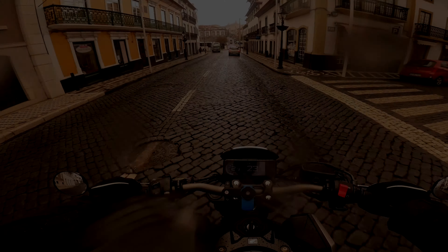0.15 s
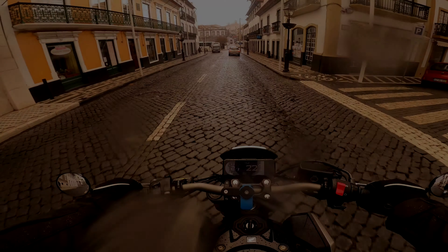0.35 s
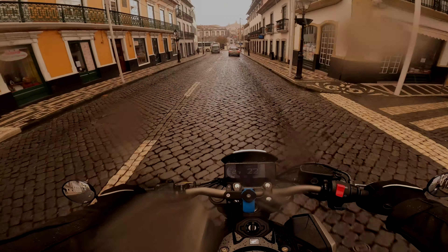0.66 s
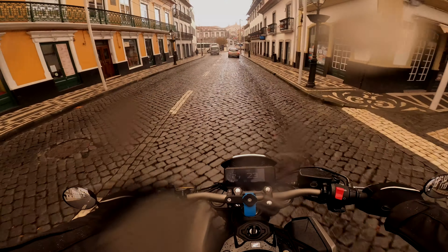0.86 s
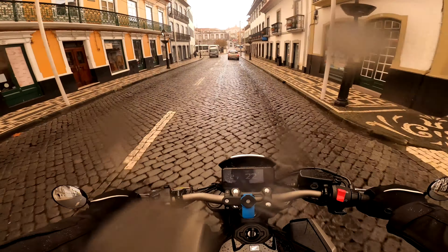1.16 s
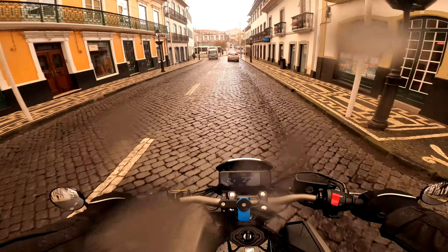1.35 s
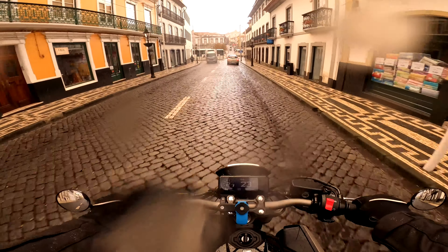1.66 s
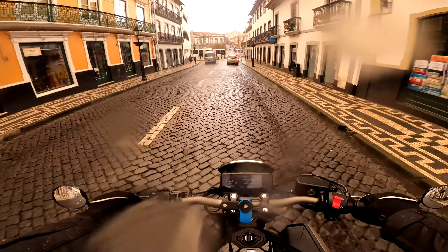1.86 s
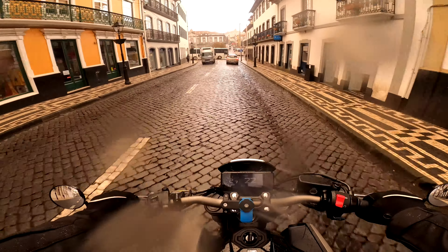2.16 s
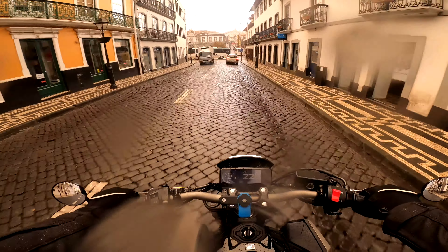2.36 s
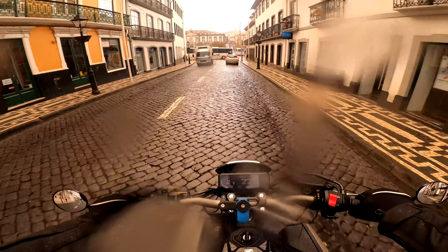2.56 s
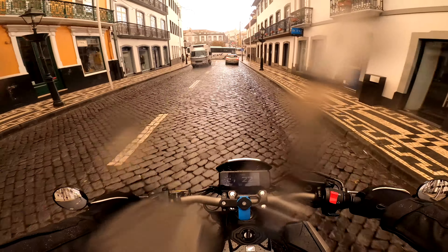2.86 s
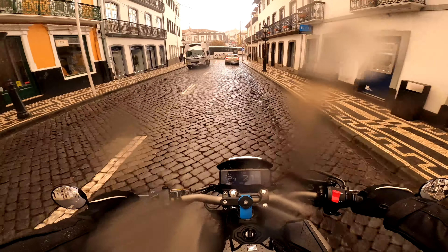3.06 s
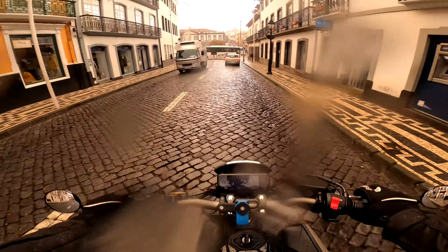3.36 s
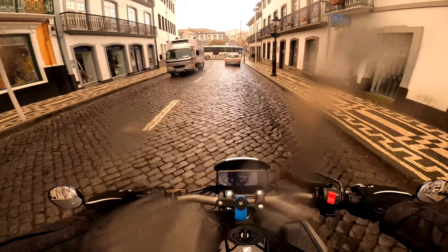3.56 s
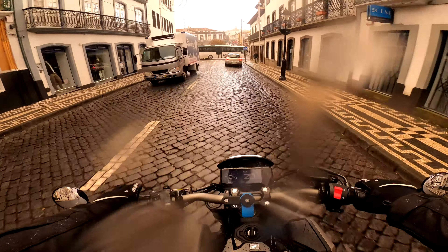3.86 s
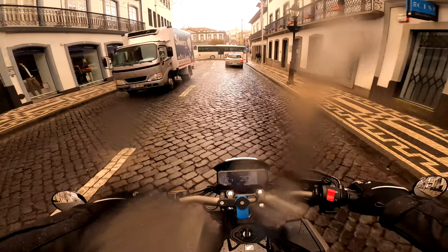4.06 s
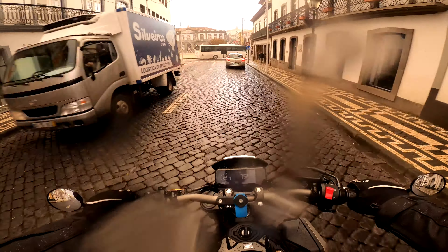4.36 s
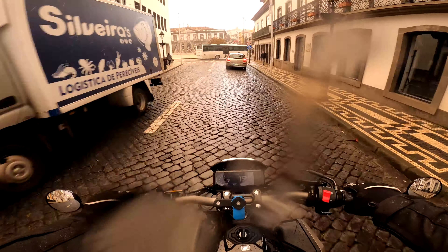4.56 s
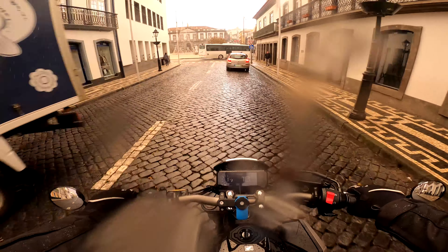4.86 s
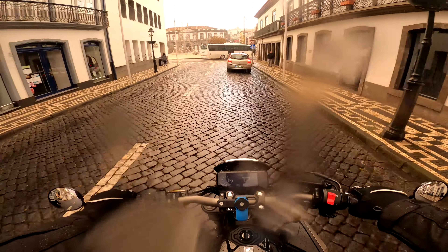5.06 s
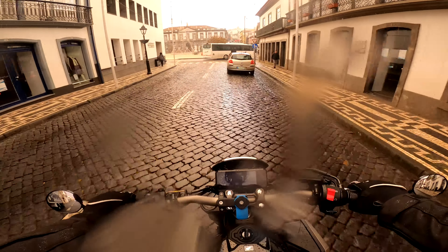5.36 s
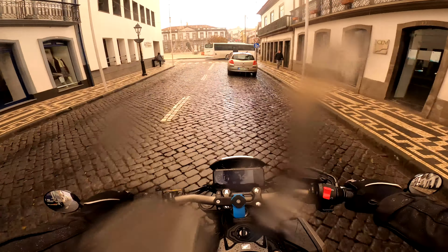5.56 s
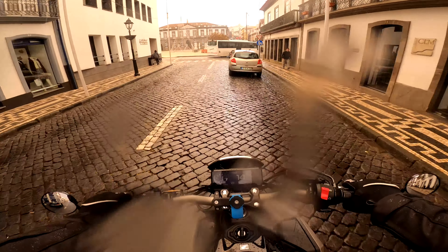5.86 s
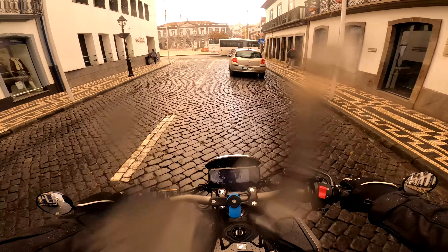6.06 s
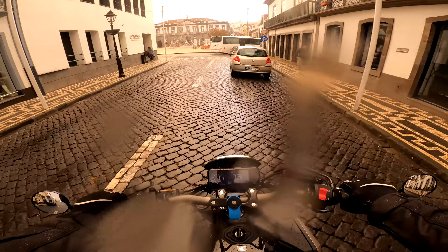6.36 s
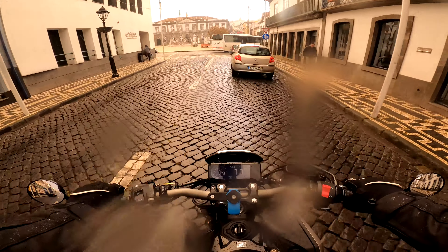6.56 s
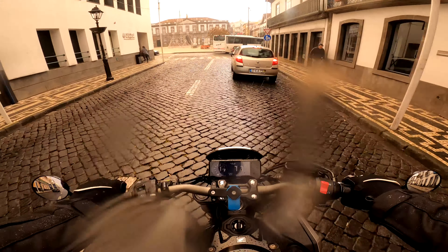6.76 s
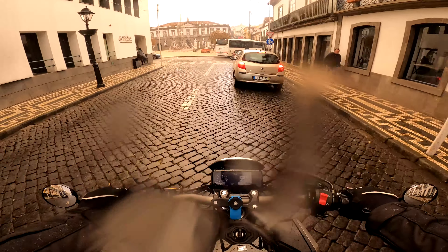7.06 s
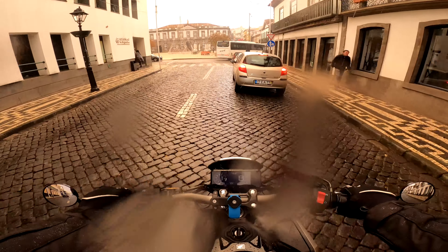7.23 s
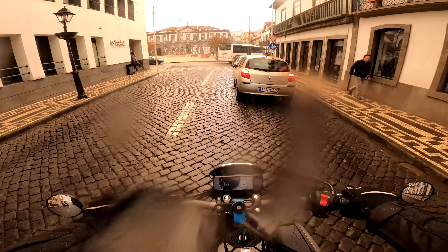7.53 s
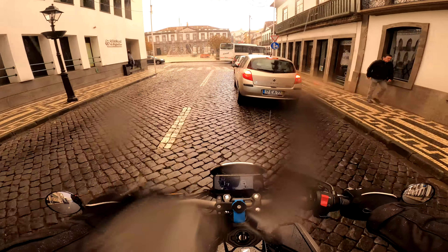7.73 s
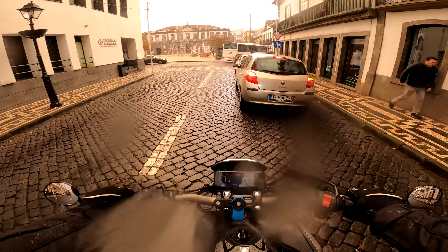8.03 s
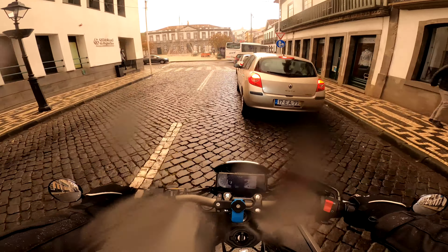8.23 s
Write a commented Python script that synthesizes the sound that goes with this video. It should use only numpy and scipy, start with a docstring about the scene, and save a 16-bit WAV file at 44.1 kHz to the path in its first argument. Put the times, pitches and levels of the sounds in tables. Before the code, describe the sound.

From the rider's helmet, a low motorcycle exhaust drums along wet stones, revs sag, a rattling lorry sweeps by, then uneven idling continues.

```python
"""A motorcycle pulls away over wet cobbles in a narrow street, heard from the rider's helmet.
At first the exhaust throbs as a train of rounded puffs over engine clatter, drumming, hissing tyres and soft wind;
exhaust, clatter and drumming follow firing or wheel cycles, while the hiss and wind drift at random,
and a wavering sine soon whines from the drive. The throttle closes, the revs sag, and the brake squeaks in thin tones.
A box lorry splashes past the other way, as noise swelling with nearness plus jolts and puddle slaps; a few
raindrops begin to tick on the microphone housing as snaps and short rings, and the engine drops to a hunting idle."""
import sys
import numpy as np
from scipy import signal
from scipy.fft import rfft, irfft
from scipy.io import wavfile
from scipy.ndimage import uniform_filter1d, minimum_filter1d

SR = 44100
rng = np.random.default_rng(int(sys.argv[2]) if len(sys.argv) > 2 else 0)


def store_pcm(level_fs):
    """Save levels as 16-bit WAV."""
    pcm = np.round(np.clip(level_fs, -1, 1) * 32767).astype(np.int16)
    wavfile.write(sys.argv[1], SR, np.atleast_2d(pcm).T)


N = 370170
TIME = np.arange(N) / SR

# Engine speed, in firings per second: it picks up, cruises and surges to and fro until the throttle closes.
START_HZ, CRUISE_HZ, PICKUP_S = 65.5, 70.5, .25
SURGE_HZ, SURGE_PERIOD_S, SURGE_CREST_S = 1.9, .44, .56  # depth, period and the moment of one crest
THROTTLE_OFF_S = 2.19
# Revs sagging against the closed throttle, then falling once declutched.
# Each row: time in seconds, firings per second.
REV_SAG = [(2.3, CRUISE_HZ), (2.62, 67.5), (2.88, 63), (3.35, 61.3), (4.08, 61), (4.5, 56), (4.83, 53),
           (5.18, 39.5)]
# The hunting idle. Each row: time in seconds, firings per second.
IDLE_HUNT = [(5.2, 41.1), (6.38, 41.7), (6.86, 40.3), (7.31, 41.7), (7.45, 40.3), (7.86, 41.6),
             (7.99, 40.3), (8.15, 41.7), (8.39, 41.6)]
LOAD_POWER = 1.1  # load goes as this power of the revs above idle

# Exhaust level under load and at idle, and the change while the wheels drive the engine.
EXHAUST_LOAD_DB, EXHAUST_IDLE_DB, OVERRUN_DB = -11, -8.6, -1
HUNT_DB_PER_HZ = 0.5  # the idle swells as it speeds up
# Half the time from dip to crest of a puff: under load, at idle, and what the overrun adds.
PUFF_LOAD_S, PUFF_IDLE_S, PUFF_OVERRUN_S = 0.0025, 0.0022, 0.00028
FIRING_SCATTER_DB = .8
EASE_S = 0.22  # the throttle eases this long before it shuts
RECOVERY_S, RECOVERY_RELEASE_S = 4.7, 0.21  # the engine takes up its own idle again
# Resonances of the silencer shell. Each row: pitch in Hz, nominal width in Hz, mean level in dB.
SHELL_MODES = [(122.3, 10.6, -26), (209.8, 20, -29), (247.5, 23, -30.5)]
SHELL_WANDER_DB = 3
# Hollow notes in the silencer.
# Each row: start in seconds, length in seconds, multiple of the firing rate, level in dB.
SILENCER_BOOMS = [(.1, .95, 2, -23), (1.3, .55, 2, -22), (.4, 2.2, 4, -35), (1.95, .75, 2, -27),
                  (2.76, .62, 2, -21), (4.19, .08, 2, -18), (4.44, .06, 2, -20), (4.63, .06, 2, -19),
                  (4.77, .06, 2, -18), (4.55, .28, 4, -28), (4.93, .06, 2, -21), (6.23, .1, 3, -23),
                  (6.7, .15, 3, -20), (7.23, .1, 3, -22), (7.99, .1, 3, -20)]
BOOM_ATTACK_S, BOOM_RELEASE_S = .04, .03
# Brief dips of the low throb. Each row: centre in seconds, gain at the centre in dB.
THROB_LULLS = [(2.29, -5), (3.37, -6), (3.48, -6), (4.16, -5), (4.31, -10), (4.57, -10), (4.87, -9),
               (5.79, -4), (7.96, -6)]
LULL_WIDTH_S = 0.017

CLATTER_LOAD_DB, CLATTER_IDLE_DB = -38, -44
CLATTER_START_DB, CLATTER_BUILD_S = -2.5, 0.96  # the clatter builds up as the engine pulls
CASING_DB = -1.17  # trim on the ring of the casing
# Spectrum of the clatter's rush. Each row: frequency in Hz, relative density in dB per Hz.
CLATTER_SPECTRUM = [(500, -8.5), (1000, -5), (1450, 1), (1850, -3.5), (2200, -4.5), (2750, -2),
                    (3300, -10.5), (3800, -12.5), (5000, -18), (7500, -37.5)]
# Resonances of the engine casing.
# Each row: pitch in Hz, nominal width in Hz, relative level in dB under load, relative level in dB at idle.
CASING_MODES = [(279, 11, -4.5, 10.5), (453, 80, 2, -17), (662, 27, -5, -4.5), (846, 33, -17, -1.5),
                (987, 34, -3.5, 0.5), (1617, 63, -8.5, -11.5), (1724, 88, -12.5, -6),
                (2556, 140, -16.5, -8), (2803, 150, -12, -11), (3116, 100, -12.5, -26),
                (3248, 140, -15, -6.5)]

# Tyre levels, their fall once the throttle is shut, and the build-up of spray as the machine gathers way.
ROAR_DB, ROAR_FALL_DB_PER_S = -29.5, 0.18
SPRAY_DB, SPRAY_FALL_DB_PER_S = -52.5, 0.7
SPRAY_START_DB, SPRAY_BUILD_S = -1, .55
# Wheels drumming on the stones.
# Each row: time in seconds, stones per second, drum level in dB, unevenness under the front wheel (0-1).
COBBLE_RUN = [(0, 64, -23, .21), (.95, 62, -23.5, .18), (1.15, 64, -19, .21), (1.65, 62, -22, .2),
              (2.2, 54, -17.5, .11), (2.7, 57.5, -17.5, .03), (3.3, 54, -18, .04), (3.6, 56, -19, .17),
              (4.3, 57.6, -17.5, .14), (5.6, 54.3, -20, .2), (8.39, 48.5, -24.5, .19)]
# Spectrum of the drumming. Each row: frequency in Hz, relative density in dB per Hz.
TYRE_DRUM_SPECTRUM = [(12, -15), (25, -4), (38, 2), (62, -6), (88, 0), (118, -2.5), (150, -3.5), (190, -15),
                      (260, -15.5), (340, -23.5), (700, -43.5)]
# Spectrum of the tyre roar. Each row: frequency in Hz, relative density in dB per Hz.
TYRE_ROAR_SPECTRUM = [(100, -18.5), (220, 3), (300, -2), (450, -5.5), (560, -5.5), (700, -4.5),
                      (850, -10.5), (1000, -10.5), (1150, -13.5), (1500, -17.5), (2200, -30)]
# Spectrum of the water hiss. Each row: frequency in Hz, relative density in dB per Hz.
TYRE_SPRAY_SPECTRUM = [(1500, -13.5), (3500, 7.5), (5000, -5.5), (6800, -3.5), (7800, -11), (9700, -10),
                       (12000, -19.5), (14000, -31.5), (15500, -42.5)]

WIND_DB, WIND_BUILD_S = -28, 0.9  # buffeting grows as the motorcycle gathers way
# Spectrum of the buffeting. Each row: frequency in Hz, relative density in dB per Hz.
WIND_SPECTRUM = [(10, -4.5), (22, -5.5), (35, 1.5), (70, -8.5), (150, -26)]

# Snatches of thin whine from the drive.
# Each row: start in seconds, length in seconds, starting pitch in Hz, glide in Hz per second, level in dB.
DRIVE_WHINES = [(.35, 1.6, 1603, -0.5, -43.5), (.5, 1.4, 3150, 0, -48.5), (1.93, 0.76, 1400, -16, -47.5),
                (2.9, 0.72, 1384, -65.5, -46), (6.7, .6, 1390, -2.5, -48), (7.35, 0.82, 1422, 0, -44)]
WHINE_ATTACK_S, WHINE_RELEASE_S = 0.19, 0.39
# Chirps where the drive catches. Each row: crest in seconds, pitch in Hz, level in dB.
DRIVE_CHIRPS = [(2.02, 1375, -32), (2.17, 1400, -37.5), (2.245, 1410, -36), (2.425, 1405, -34.5),
                (2.465, 1410, -34), (2.545, 1380, -35), (2.585, 1410, -36), (2.68, 1395, -36),
                (2.81, 1405, -34.5), (3.38, 1335, -37), (3.52, 1365, -34.5), (7.57, 1425, -34),
                (7.85, 1425, -33.5), (8.11, 1420, -37), (8.35, 1420, -37)]
CHIRP_WIDTH_S = .016

# Spectrum of the lorry's rumble. Each row: frequency in Hz, relative density in dB per Hz.
LORRY_BODY_SPECTRUM = [(40, -18), (110, 10.5), (220, 2.5), (400, 3.5), (600, 1.5), (850, -3), (1300, -7.5),
                       (2000, -19.5), (3300, -28.5), (6000, -49.5)]
# Spectrum of the lorry's spray. Each row: frequency in Hz, relative density in dB per Hz.
LORRY_SPRAY_SPECTRUM = [(400, 6), (1000, 11), (2000, 1.5), (3100, 3), (4200, -5.5), (5600, -9.5),
                        (7500, -19), (10000, -27), (13000, -36), (15500, -49)]
JUDDER_HZ, JUDDER_DEPTH = 18, .4
SHIELD_S, SHIELD_TIME_S = 4.99, 0.72  # once the lorry is behind, the rider's body shields its spray
# Jolts of the lorry's box on the stones.
# Each row: start in seconds, level in dB, decay time in seconds, panel pitch in Hz.
BOX_JOLTS = [(4.569, -20.5, 0.062, 408), (4.604, -22.5, 0.015, 1390), (4.61, -26, 0.051, 600),
             (4.72, -22.5, 0.014, 890), (4.785, -23, 0.012, 1010), (4.84, -16, 0.0088, 865),
             (4.89, -21, 0.03, 393), (4.945, -29, 0.05, 1190), (4.984, -22, 0.067, 393),
             (5.051, -23, 0.024, 620), (5.115, -23.5, 0.056, 417), (5.165, -25.5, 0.07, 400)]
PANEL_WIDTH = 0.3  # nominal width of a panel's resonance as a share of its pitch
# Lorry wheels slapping through puddles. Each row: start in seconds, level in dB, decay time in seconds.
PUDDLE_SLAPS = [(4.605, -30, 0.016), (4.622, -33, .014), (4.783, -34, .006), (4.914, -27.5, 0.013),
                (5.095, -37, 0.021), (5.215, -40, 0.013)]

# Brake squeaks. Each row: start in seconds, length in seconds, pitch in Hz, level in dB.
BRAKE_SQUEAKS = [(2.733, .03, 3335, -43), (2.77, .023, 3315, -39.5), (2.812, .023, 3330, -41),
                 (2.847, .014, 3325, -40), (2.872, .01, 3305, -43.5), (2.9, .029, 3345, -39),
                 (2.938, .014, 3310, -43), (2.971, .009, 3280, -39), (2.986, .04, 3325, -42.5),
                 (3.035, .012, 3355, -41.5), (3.059, .024, 3370, -43), (3.094, .05, 3400, -49)]
BRAKE_ATTACK_S, BRAKE_RELEASE_S = .006, .01

# Raindrops on the housing. Each row: start in seconds, level in dB, ring pitch in Hz, ring width in Hz.
RAINDROPS = [(4.525, -42, 13000, 1200), (5.535, -46, 8650, 90), (6.3, -39, 12000, 4000),
             (7.455, -43, 8650, 90), (8.25, -37, 12000, 3000)]
# Spectrum of a drop's snap. Each row: frequency in Hz, relative density in dB per Hz.
DROP_SNAP_SPECTRUM = [(4000, -12), (7000, 3), (10000, -6), (14500, 3)]

FADE_IN_DB, FADE_IN_S = -5.5, 0.46  # the sound opens from this level, with this time constant
TOP_HZ = 15400


def undb(db):
    """Decibels to gain."""
    return 10 ** (np.asarray(db) / 20)


def unit(x):
    """Scale to rms 1."""
    return x / np.sqrt(np.mean(x ** 2))


def curves(table):
    """The columns of a table after its times, joined by straight lines in time."""
    times, *columns = np.transpose(table)
    return [np.interp(TIME, times, column) for column in columns]


def since(s):
    """Seconds gone by after a moment, zero before it."""
    return np.maximum(TIME - s, 0)


def spell(s, length, attack, release):
    """Envelope that rises, holds and dies away."""
    return np.minimum(since(s) / attack, 1) * np.exp(-since(s + length) / release)


def swell(s, width):
    """A rounded envelope with its crest at s."""
    return np.exp(-((TIME - s) / width) ** 2)


def blows(table, attack_s):
    """Envelope of blows (s, dB, decay s) that rise quickly and die away."""
    envelope = np.zeros(N)
    for s, db, decay in table:
        rise = 1 - np.exp(-since(s) / attack_s)
        envelope += undb(db) * np.exp(-since(s) / decay) * rise
    return envelope


def noise():
    """White noise."""
    return rng.standard_normal(N)


def walk(rate):
    """Smooth random drift of rms 1 that changes about rate times a second."""
    hold = max(int(SR / rate), 2)
    steps = noise()[np.arange(N) // hold]
    return unit(uniform_filter1d(uniform_filter1d(steps, hold), hold))


def colour(x, spectrum, size=16384):
    """Ring x through a causal body with the given spectrum, falling away beyond both ends; rms 1."""
    hz, db = np.transpose(spectrum)
    bins = np.maximum(np.fft.rfftfreq(size, 1 / SR), 1)
    skirts = (np.minimum(bins / hz[0], 1) * np.minimum(hz[-1] / bins, 1)) ** 2
    response = skirts * undb(np.interp(np.log(bins), np.log(hz), db))
    # folding the cepstrum forward gives minimum phase: nothing sounds before its cause
    cepstrum = irfft(np.log(response))
    cepstrum[1:size // 2] *= 2
    cepstrum[size // 2 + 1:] = 0
    body = irfft(np.exp(rfft(cepstrum)))
    return unit(signal.fftconvolve(x, body)[:N])


def ring(x, hz, width):
    """A resonance of nominal width applied twice, for steep skirts; rms 1."""
    b, a = signal.iirpeak(hz, hz / width / 2, fs=SR)
    return unit(signal.lfilter(b, a, signal.lfilter(b, a, x)))


def pulses(turns, scatter_db):
    """One pulse of random size at each whole turn, shared between two samples."""
    at = np.flatnonzero(np.diff(np.floor(turns)) > 0)
    late = (np.ceil(turns[at]) - turns[at]) / (turns[at + 1] - turns[at])
    size = undb(scatter_db * noise()[:len(at)])
    out = np.zeros(N)
    out[at] = size * (1 - late)
    out[at + 1] = size * late
    return out


def cycles(hz, jitter):
    """Turns counted at a rate that wavers about 70 times a second."""
    return np.cumsum(hz * np.exp(jitter * walk(70))) / SR


def tone(hz, waver, waver_rate):
    """Phase of an unsteady tone."""
    return 2 * np.pi * np.cumsum(hz * (1 + waver * walk(waver_rate))) / SR


def burst(turns, length):
    """A gate that opens at each turn and dies away over a share of the cycle; rms 1."""
    return unit(np.exp(-(turns % 1) / length))


def passing(abreast_s, approach_s, leave_s):
    """Gain 1 / distance of a source that comes abreast and falls behind."""
    late = TIME - abreast_s
    return 1 / np.hypot(1, late / np.where(late < 0, approach_s, leave_s))


def revs():
    """Firing rate and load (0-1) as the throttle is worked; the idle catches the fall."""
    idle_hz, = curves(IDLE_HUNT)
    hz = np.maximum(curves(REV_SAG)[0], idle_hz)
    pickup = (START_HZ - CRUISE_HZ) * np.exp(-TIME / PICKUP_S)
    load = np.clip((hz + pickup - idle_hz) / (CRUISE_HZ - idle_hz), 0, 1) ** LOAD_POWER
    surge = SURGE_HZ * np.cos(2 * np.pi * (TIME - SURGE_CREST_S) / SURGE_PERIOD_S)
    return hz + pickup + surge * (TIME < THROTTLE_OFF_S), load


def exhaust(turns, hz, load):
    """Each firing leaves as a rounded dip and crest, broader on the overrun; the shell knocks hollowly."""
    overrun_s = RECOVERY_S - THROTTLE_OFF_S
    overrun = spell(THROTTLE_OFF_S - EASE_S, overrun_s, attack=0.45, release=RECOVERY_RELEASE_S)
    puff_s = load * PUFF_LOAD_S + (1 - load) * PUFF_IDLE_S + overrun * PUFF_OVERRUN_S
    sizes = undb(FIRING_SCATTER_DB * noise())
    puffs = np.zeros(N)
    for neighbour in (-1, 0, 1):  # neighbouring puffs overlap
        firing = np.round(turns).astype(int) + neighbour
        age = (turns - firing) / hz / puff_s
        puffs += sizes[firing] * age * np.exp((1 - age ** 2) / 2)

    knocks = -pulses(turns, scatter_db=2.0) / np.sqrt(hz)
    shell = np.zeros(N)
    for mode_hz, width, db in SHELL_MODES:
        shell += ring(knocks, mode_hz, width) * undb(db + SHELL_WANDER_DB * walk(5.2))

    idle_hz, = curves(IDLE_HUNT)
    idle_db = EXHAUST_IDLE_DB + HUNT_DB_PER_HZ * (idle_hz - idle_hz.mean())
    level_db = load * EXHAUST_LOAD_DB + (1 - load) * idle_db + overrun * OVERRUN_DB
    return (puffs + shell) * undb(level_db + .45 * walk(11)) + booms(turns)


def clatter(turns, load):
    """Valves and chain rattle twice per firing and ring the casing, whose colour shifts with the load."""
    gate = 1 + .2 * burst(2 * turns, length=.35) + .17 * burst(turns, length=.3)
    rush = colour(noise() * gate * undb(.5 * walk(24)), CLATTER_SPECTRUM)
    knocks = noise() * gate
    casing = np.zeros(N)
    for hz, width, loaded_db, idle_db in CASING_MODES:
        casing += ring(knocks, hz, width) * undb(load * loaded_db + (1 - load) * idle_db)
    level_db = load * CLATTER_LOAD_DB + (1 - load) * CLATTER_IDLE_DB
    build_db = CLATTER_START_DB * np.exp(-TIME / CLATTER_BUILD_S)
    return (rush + undb(CASING_DB) * casing) * undb(level_db + build_db)


def tyres():
    """Both wheels drum on uneven stones; roar scuffs at each front-wheel stone, and water hisses unsteadily."""
    stone_hz, drum_db, uneven = curves(COBBLE_RUN)
    front = cycles(stone_hz, jitter=uneven)
    rear = cycles(stone_hz, jitter=.4)
    stones = pulses(front, scatter_db=2) + .8 * pulses(rear, scatter_db=2.5)
    scuffs = noise() * (1 + 0.24 * burst(front, length=0.44)) * undb(0.81 * walk(25))
    droplets = noise() * undb(1.6 * walk(1500) + 0.62 * walk(11))

    slowing_s = since(THROTTLE_OFF_S)
    roar_db = ROAR_DB - ROAR_FALL_DB_PER_S * slowing_s
    spray_build_db = SPRAY_START_DB * np.exp(-TIME / SPRAY_BUILD_S)
    spray_db = SPRAY_DB + spray_build_db - SPRAY_FALL_DB_PER_S * slowing_s
    drum = colour(stones, TYRE_DRUM_SPECTRUM) * undb(drum_db) * lulls()
    roar = colour(scuffs, TYRE_ROAR_SPECTRUM) * undb(roar_db)
    spray = colour(droplets, TYRE_SPRAY_SPECTRUM) * undb(spray_db)
    return drum + roar + spray


def wind():
    """Air buffets the helmet in low, soft gusts."""
    gusts = undb(WIND_DB + 1.4 * walk(4.7))
    return colour(noise(), WIND_SPECTRUM) * gusts * np.minimum(TIME / WIND_BUILD_S, 1)


def booms(turns):
    """One multiple of the firing rate swells into a hollow, slightly ragged note in the silencer."""
    notes = np.zeros(N)
    for s, length, multiple, db in SILENCER_BOOMS:
        envelope = undb(db) * spell(s, length, BOOM_ATTACK_S, BOOM_RELEASE_S)
        notes += np.sin(2 * np.pi * multiple * turns) * envelope
    return notes * undb(1.5 * walk(25))


def whine(turns):
    """The drive sings in grainy, drifting snatches, pressed by each firing, and chirps where it catches."""
    contact = burst(turns, length=.8) * undb(3 * walk(55))
    out = np.zeros(N)
    for s, length, hz, glide, db in DRIVE_WHINES:
        phase = tone(hz + glide * since(s), waver=.008, waver_rate=70)
        envelope = undb(db) * spell(s, length, WHINE_ATTACK_S, WHINE_RELEASE_S)
        out += contact * np.sin(phase) * envelope
    phase_per_hz = tone(1, waver=.012, waver_rate=200)
    for s, hz, db in DRIVE_CHIRPS:
        out += np.sin(phase_per_hz * hz) * undb(db) * swell(s, CHIRP_WIDTH_S)
    return out


def lorry():
    """Spray and rumble swell as 1 / distance: gritty spray peaks first, then the juddering box."""
    in_earshot = np.interp(TIME, [1.8, 3.6, 5.7, 6.8], [0, 1, 1, 0])
    judder = 1 + JUDDER_DEPTH * burst(cycles(JUDDER_HZ, jitter=.3), length=.35)
    rumble_gain = undb(-25.5) * passing(abreast_s=5.08, approach_s=1.0, leave_s=0.43)
    rumble = rumble_gain * colour(noise() * judder, LORRY_BODY_SPECTRUM)

    shielded = np.exp(-since(SHIELD_S) / SHIELD_TIME_S)
    spray_gain = undb(-32.5) * passing(abreast_s=4.775, approach_s=0.38, leave_s=0.2) * shielded
    slaps = blows(PUDDLE_SLAPS, attack_s=0.0023)
    grit = undb(2.5 * walk(700) + .6 * walk(60))
    spray = (spray_gain + slaps) * colour(noise() * grit, LORRY_SPRAY_SPECTRUM)
    return in_earshot * (rumble + jolts() + spray)


def lulls():
    """Gain of the low throb, which falls away briefly now and then."""
    return undb(sum(db * swell(s, LULL_WIDTH_S) for s, db in THROB_LULLS))


def brake():
    """The pad catches and slips on the wet disc in a stutter of thin squeaks with a weak octave."""
    starts, _, pitches, _ = np.transpose(BRAKE_SQUEAKS)
    pitch_hz = np.interp(TIME, starts + BRAKE_ATTACK_S, pitches)
    phase = tone(pitch_hz, waver=.007, waver_rate=260)
    grip = np.zeros(N)
    for s, length, _, db in BRAKE_SQUEAKS:
        grip += undb(db) * spell(s, length, BRAKE_ATTACK_S, BRAKE_RELEASE_S)
    squeal = np.sin(phase) + undb(-18) * np.sin(2 * phase)
    return squeal * grip * undb(1.5 * walk(200))


def raindrops():
    """Each drop snaps on the housing and rings it for an instant; a narrower resonance rings longer."""
    out = np.zeros(N)
    snap = colour(noise(), DROP_SNAP_SPECTRUM)
    for s, db, hz, width in RAINDROPS:
        age = since(s)
        out += undb(db) * np.exp(-np.pi * width * age) * np.sin(2 * np.pi * hz * age)
        out += snap * blows([(s, db - 7, .0014)], attack_s=.0001)
    return out


def jolts():
    """Each jolt sets one panel of the lorry's box rattling in its own register."""
    shake = noise()
    out = np.zeros(N)
    for s, db, decay, hz in BOX_JOLTS:
        panel = ring(shake, hz, hz * PANEL_WIDTH)
        out += panel * blows([(s, db, decay)], attack_s=0.0079)
    return out


def scene():
    """The motorcycle, running unevenly while the wheels drive it, with wind, lorry and raindrops."""
    hz, load = revs()
    unevenness = spell(THROTTLE_OFF_S, RECOVERY_S - THROTTLE_OFF_S, attack=2.2, release=.4)
    turns = cycles(hz, jitter=.014 + .035 * unevenness)
    engine = exhaust(turns, hz, load) * lulls() + clatter(turns, load) + whine(turns)
    return (engine + tyres() + wind() + lorry() + brake() + raindrops())[None]


def record(dry):
    """The sound fades in, a limiter turns the loudest peaks down, the end fades and the top is cut."""
    sound = dry * undb(FADE_IN_DB * np.exp(-TIME / FADE_IN_S))
    ceiling = .66
    wanted = ceiling / np.maximum(np.abs(sound), ceiling)
    gain = uniform_filter1d(minimum_filter1d(wanted, size=600), size=600)
    closing = np.minimum((TIME[-1] - TIME) / .006, 1)
    top_cut = signal.ellip(8, .2, 70, TOP_HZ, fs=SR, output="sos")
    return signal.sosfilt(top_cut, sound * gain * closing)


dry = scene()
out = record(dry)
store_pcm(out)
```